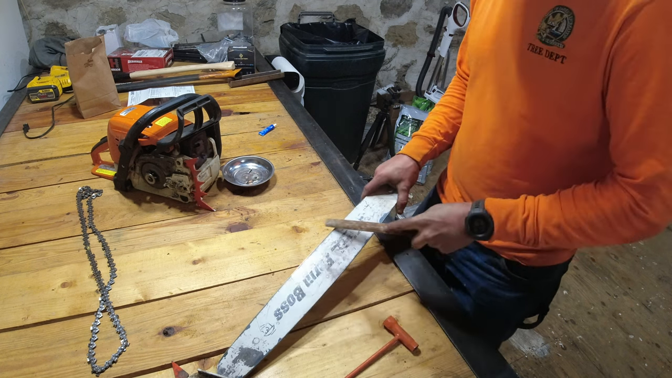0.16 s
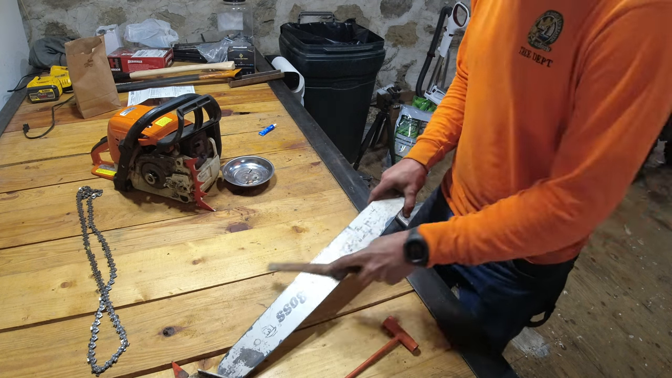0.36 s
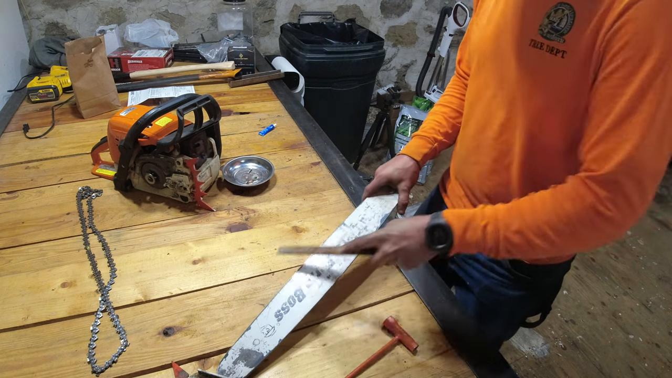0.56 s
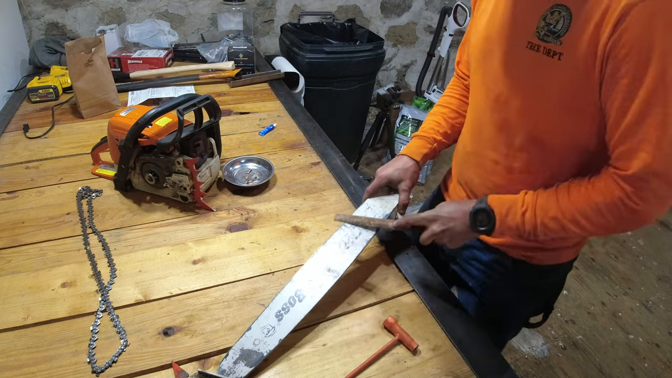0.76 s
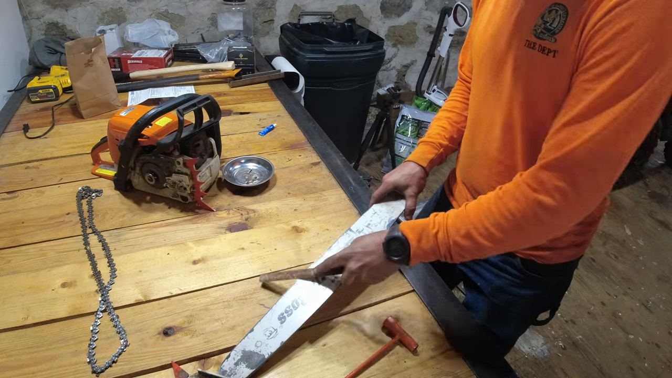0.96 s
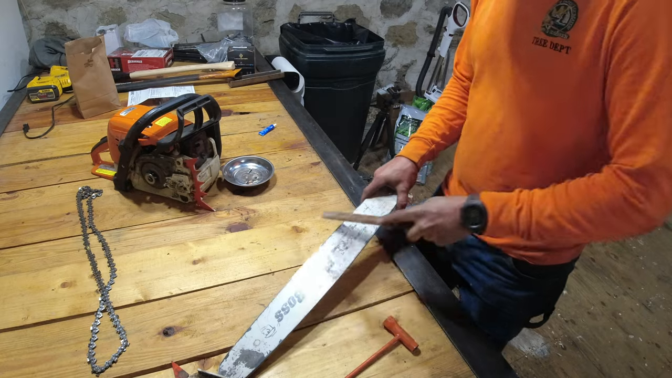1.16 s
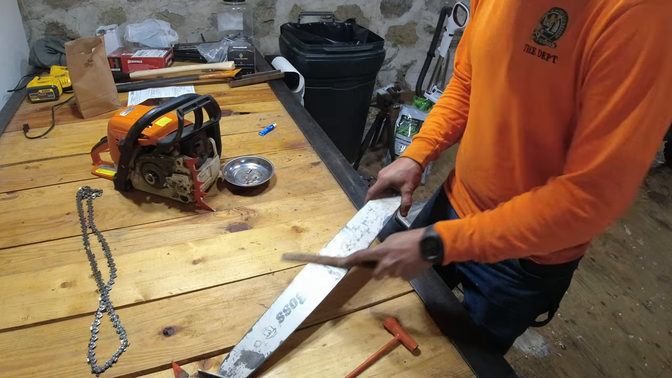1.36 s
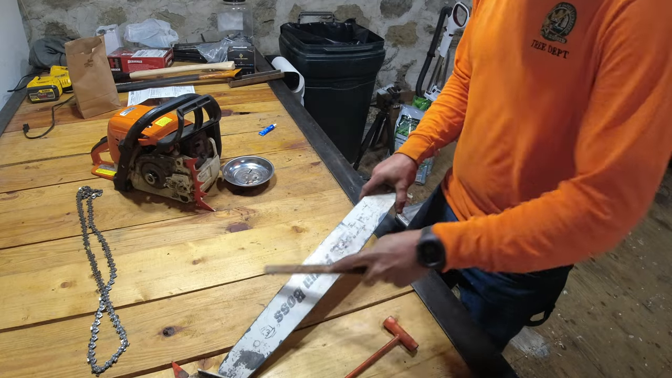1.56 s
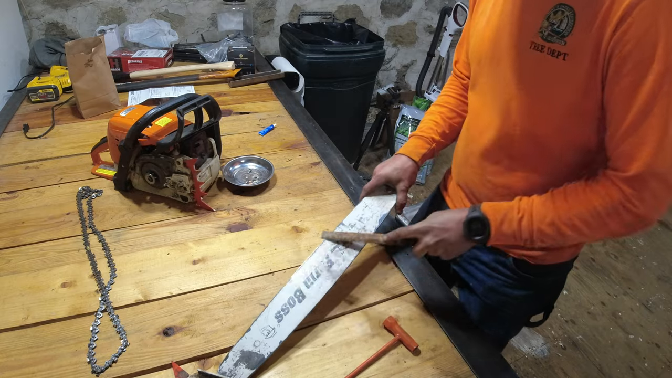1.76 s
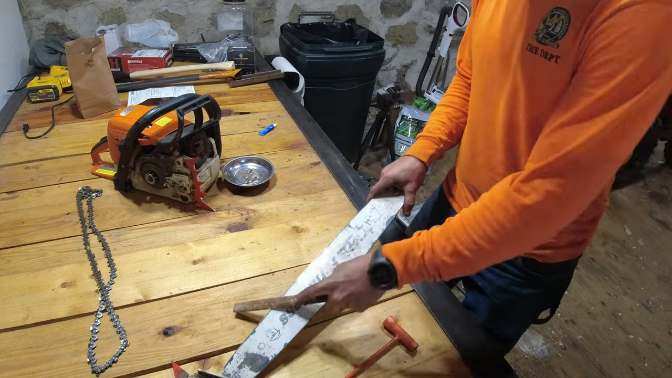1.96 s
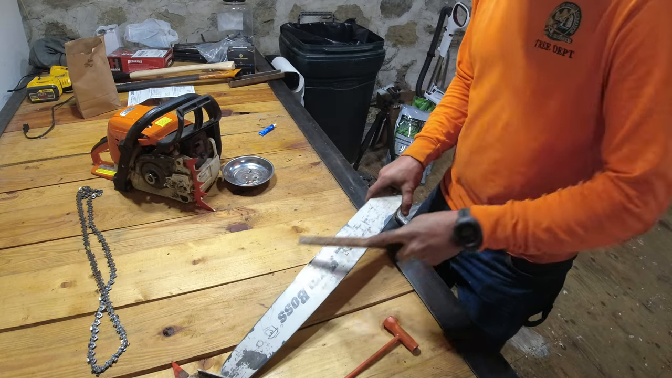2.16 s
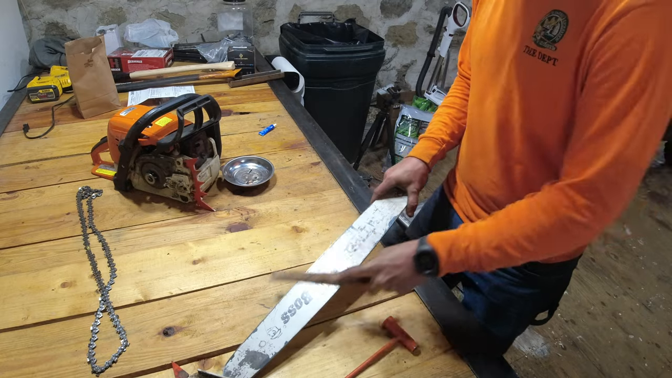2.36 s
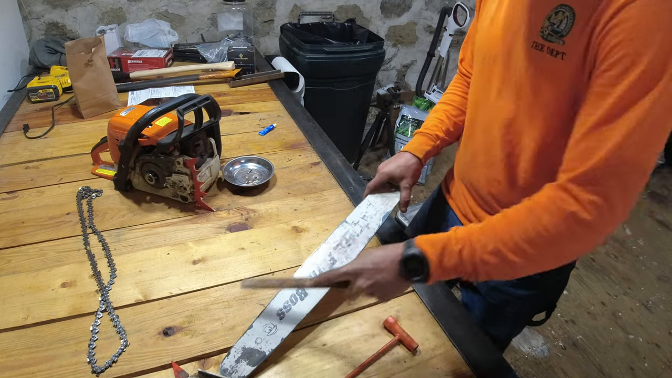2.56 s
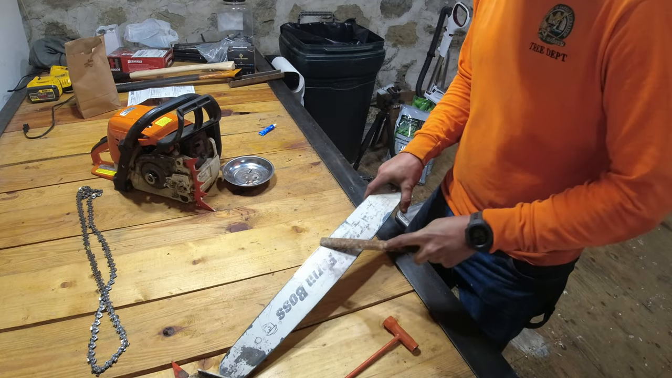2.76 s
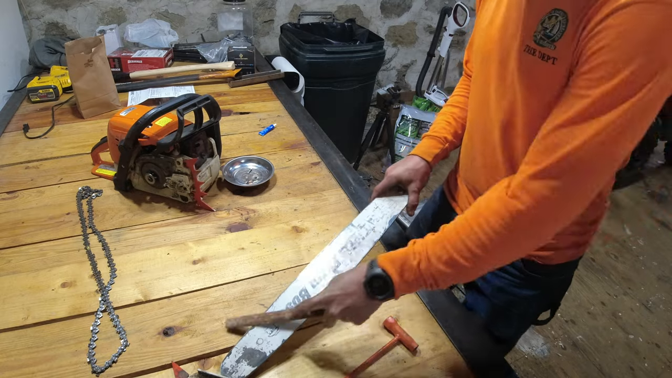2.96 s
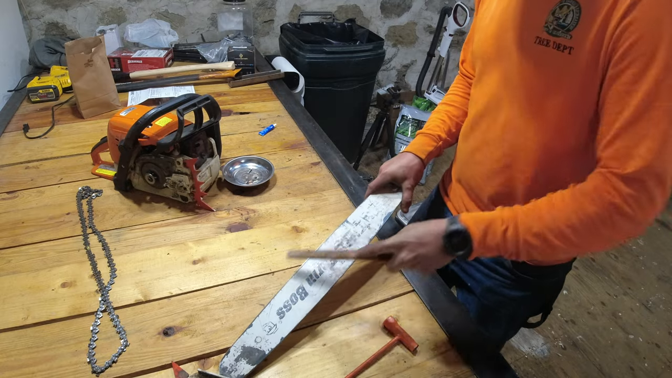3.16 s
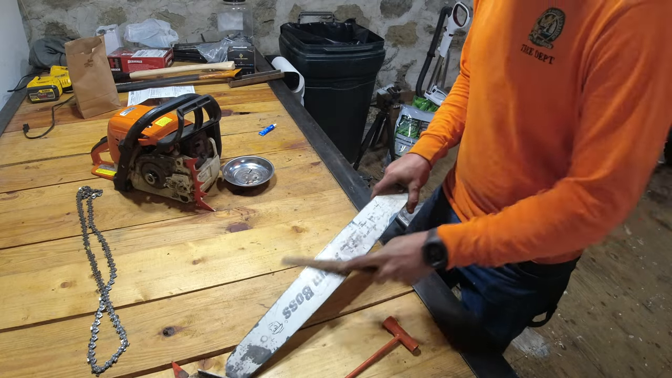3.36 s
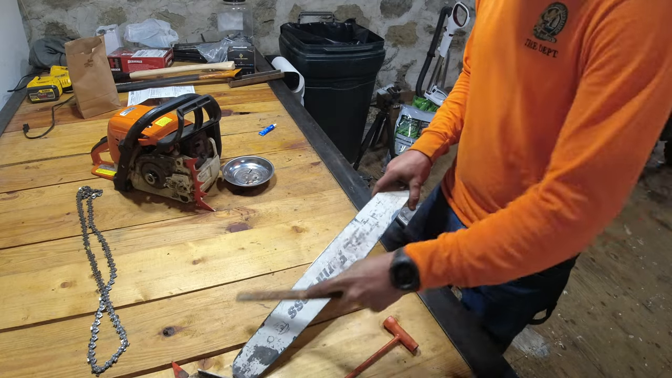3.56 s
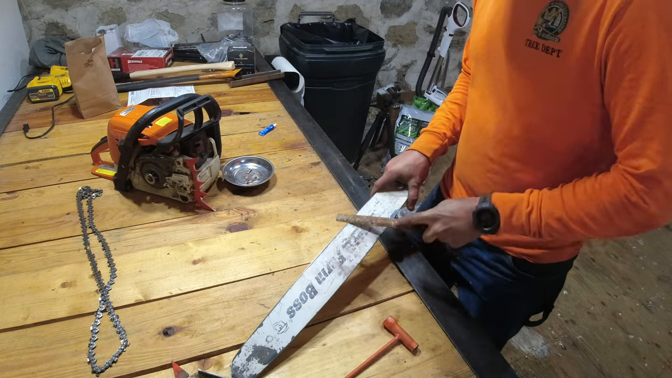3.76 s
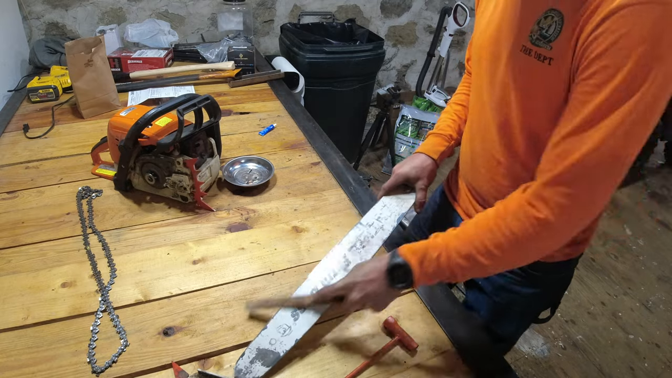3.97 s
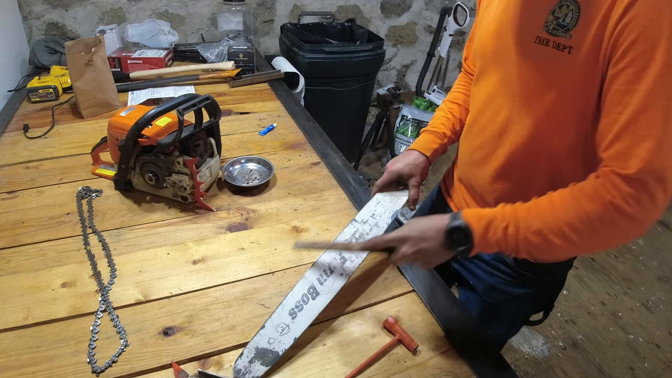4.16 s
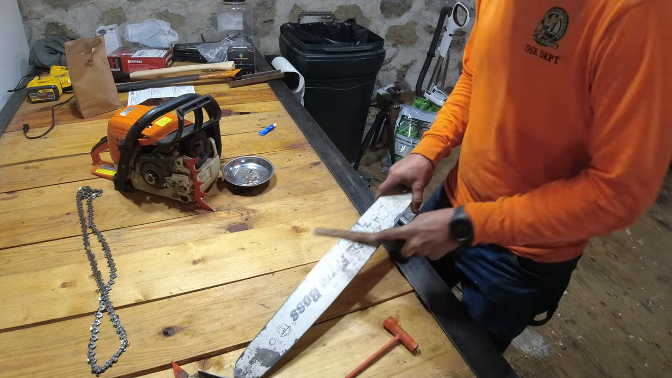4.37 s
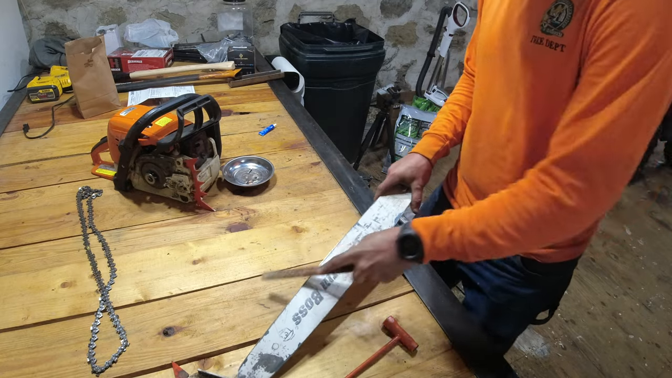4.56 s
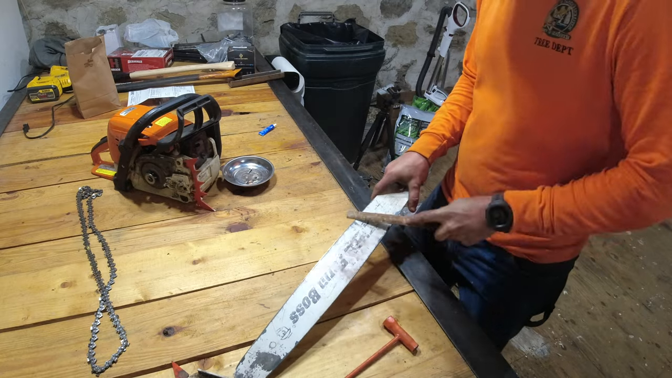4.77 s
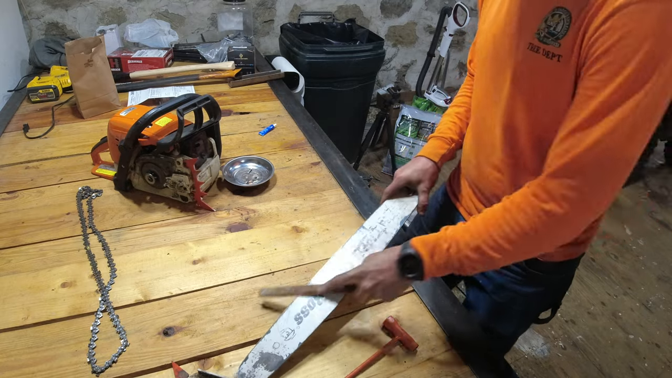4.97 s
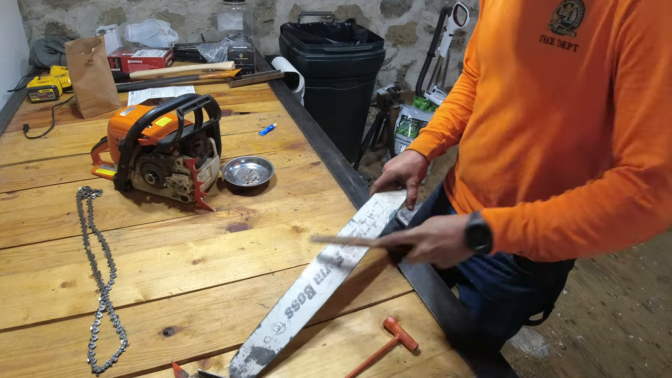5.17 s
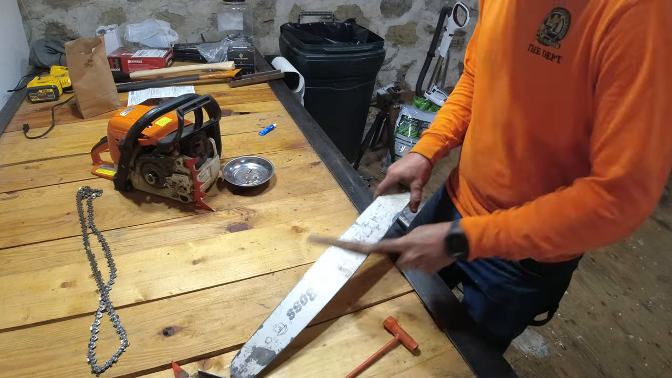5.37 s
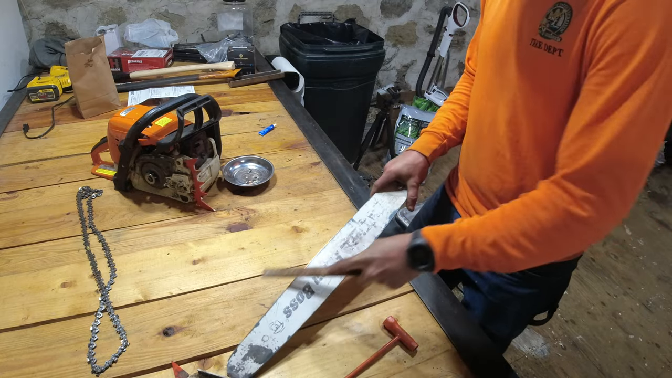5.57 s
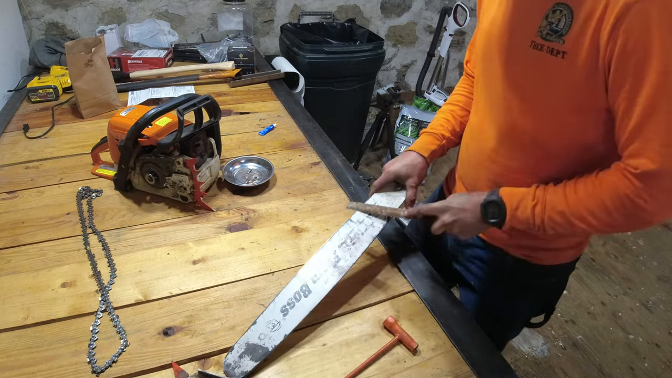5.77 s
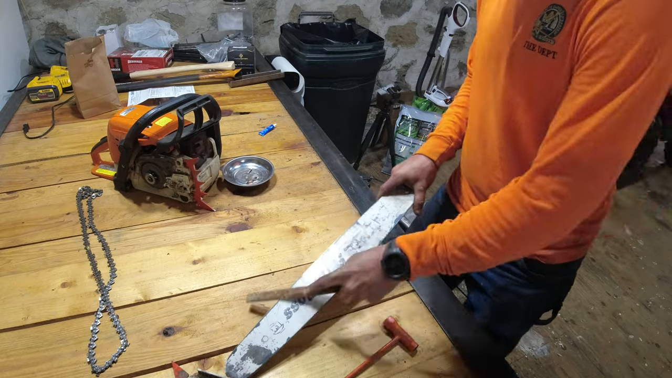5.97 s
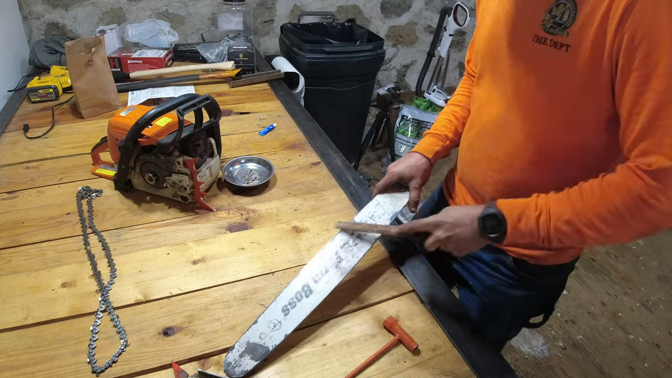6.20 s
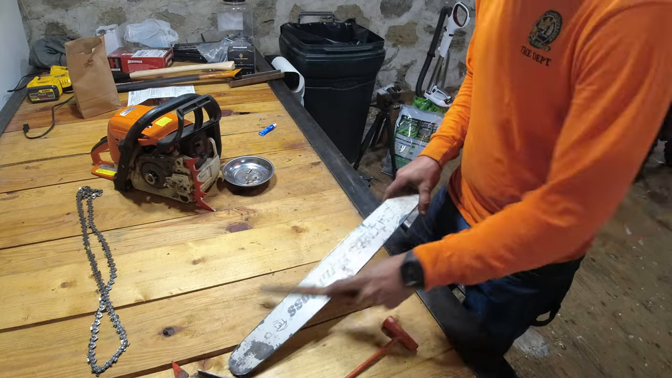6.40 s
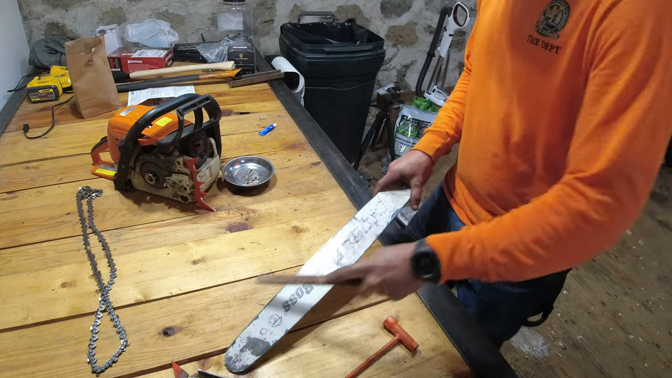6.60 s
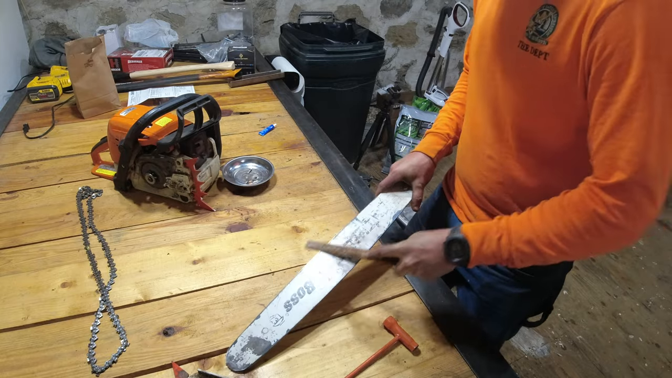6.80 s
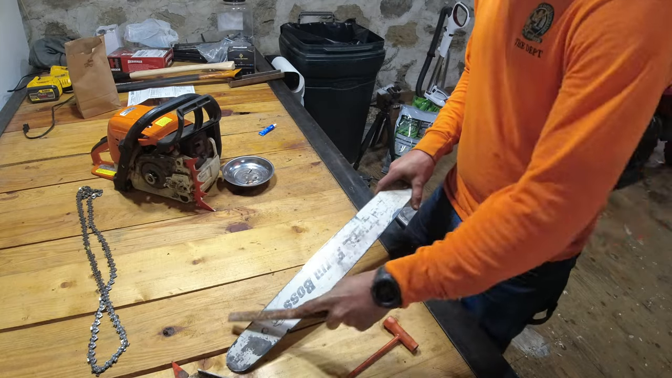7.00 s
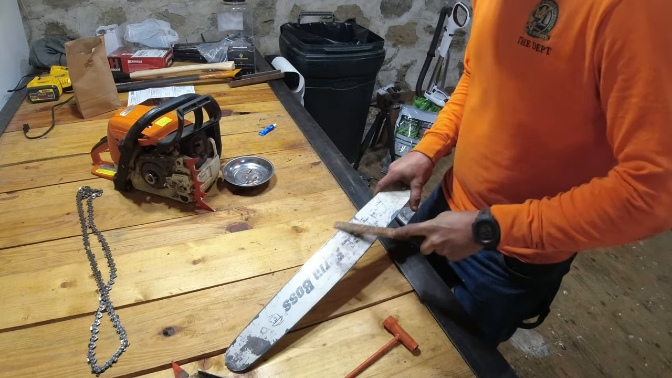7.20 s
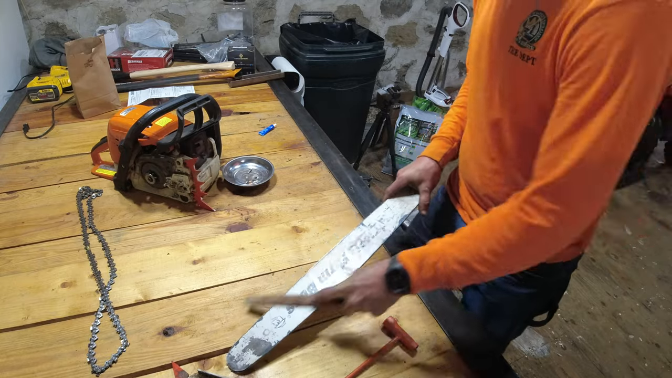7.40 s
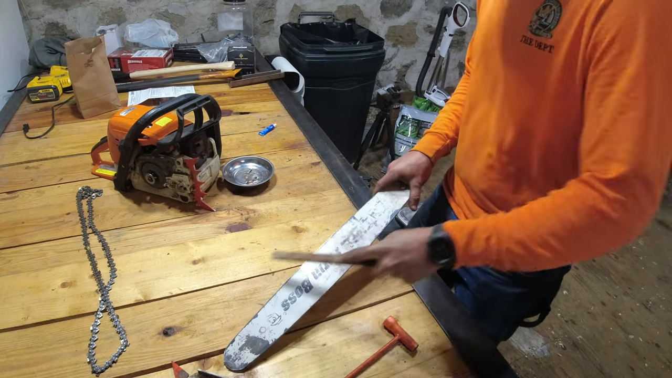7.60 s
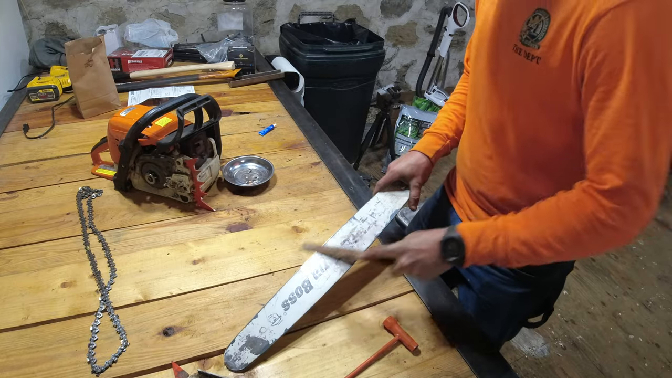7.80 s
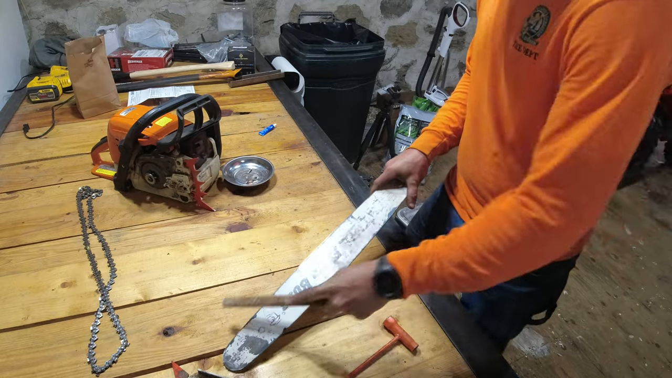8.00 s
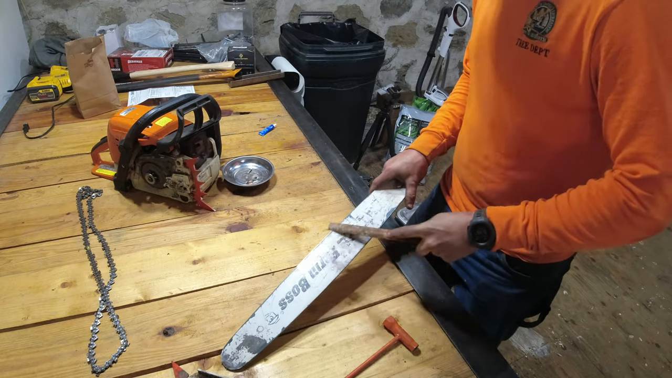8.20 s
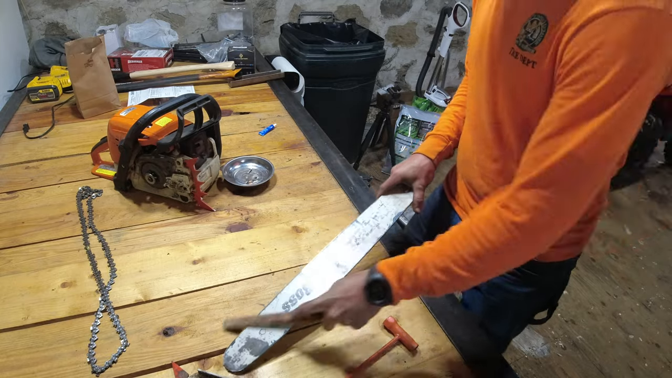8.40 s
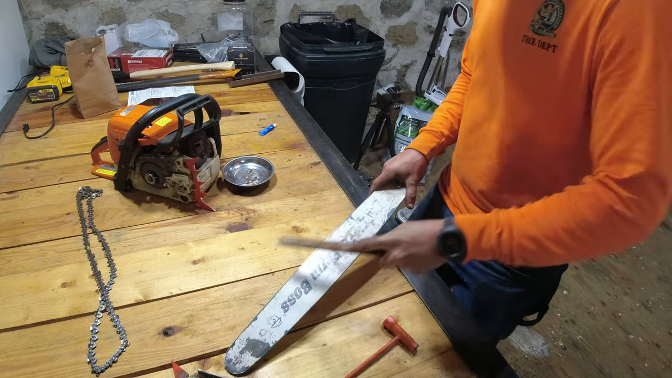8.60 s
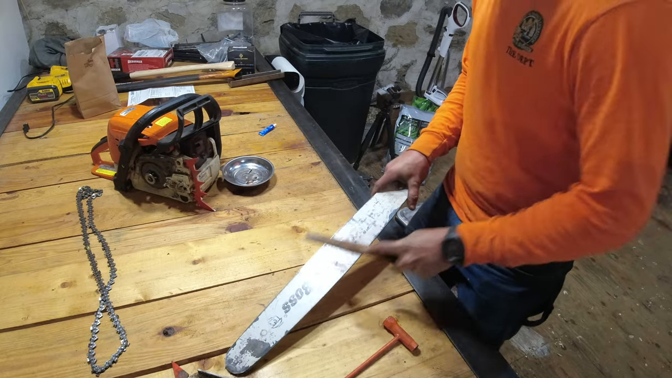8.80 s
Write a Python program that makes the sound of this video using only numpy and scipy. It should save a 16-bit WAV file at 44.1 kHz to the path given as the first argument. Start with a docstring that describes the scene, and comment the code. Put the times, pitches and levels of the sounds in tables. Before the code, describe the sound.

From 0 to about 9 seconds, a flat file is pushed along the edge of a steel chainsaw bar at a workbench. The sound opens at the end of a stroke already under way; new strokes land at about 0.3, 0.8, 1.3 and 1.8 seconds, and so on at half-second intervals, the last near 8.8. Each begins with a hard metallic clack and little rebound, with a soft low bench thump underneath. The teeth bite, and a dry rasp with buzzing grain and bright fizz quickens for about 0.2 seconds, the steel ringing briefly, then lifts off abruptly. Landings vary in force, with a gentle one near 1.8. Very faint return scuffs appear in some gaps, such as 0.26, 4.7 and 5.2. A soft low bump comes near 8.05. The perspective is close, with short small-room reflections and slight rumble.

```python
"""Filing steel on a wooden bench

A flat file lands on the edge of a steel guide bar and is pushed along it, about twice a second.
Tooth impulses and random chip impulses excite resonant modes of bar and file, over a rasp and a fizz.
Each new landing is a noise blow with a small bounce, and decaying sines thump the bench.
Noise tails give the answer of a small workshop; a faint rumble lies beneath."""
import sys
import numpy as np
from scipy import signal
from scipy.fft import rfft, irfft, next_fast_len
from scipy.io import wavfile
from scipy.ndimage import uniform_filter1d, map_coordinates

SR = 44100
rng = np.random.default_rng(int(sys.argv[2]) if len(sys.argv) > 2 else 0)


def unload_audio(sound):
    """Save the sound as a 16-bit wav file, at the path given as the first command line argument."""
    columns = np.transpose(np.atleast_2d(sound))
    # keep every value between -1 and 1, then stretch to whole-number steps
    steps = np.round(np.clip(columns, -1, 1) * 32767)
    wavfile.write(sys.argv[1], SR, steps.astype(np.int16))


N = 390285

# All table levels are relative; each source adds its own gain.
# One row a stroke, the first already under way at t = 0. Columns: landing t/s, blow level/dB,
# bench thump level/dB, bite t/s, rebound dip/dB, hardest push t/s, lift t/s, coarse cut level/dB,
# fine chips level/dB, chip sag/(dB/s), full tooth rate f/Hz, full rate t/s, tooth buzz level/dB.
# Times after the first column count from the landing.
STROKES = [ (-0.23, -18, -33, 0.034, 10, .11, .2, -23.5, -39, 42.5, 525, 0.11, 7),
           (0.2830, -13.5, -30.5, 0.02, 16, 0.13, 0.2, -24, -35.5, 27.5, 547, .179, -2.5),
           (0.808, -18, -35.5, 0.033, 26.5, 0.15, .19, -24.5, -34, 18, 510, 0.15, -5.5),
           (1.3121, -16.5, -38.5, 0.046, 17.5, 0.11, .19, -25, -36, 33, 600, 0.13, -0.5),
           (1.8092, -28.5, -32, 0.03, 17.5, 0.15, .23, -25.5, -34.5, 39.5, 545, 0.11, -1),
           (2.337, -13, -31, .022, 5, 0.093, 0.19, -23.5, -40, 14, 717, .142, -11.5),
           (2.8265, -22, -32, 0.039, 25.5, 0.13, 0.22, -25, -36, 45, 720, 0.14, -5),
           (3.3448, -17.5, -30.5, 0.038, 13, 0.11, 0.21, -24.5, -34.5, 67.5, 623, .12, -5),
           (3.8536, -14.5, -32, 0.042, 11.5, .11, 0.22, -24.5, -35.5, 49.5, 312, 0.11, -4),
           (4.3706, -18, -33.5, 0.033, 6, 0.12, 0.18, -25.5, -34, 103.5, 680, 0.13, -0.5),
           (4.8724, -12, -35, .039, 10, 0.098, 0.18, -25, -34, 79.5, 537, .119, -4),
           (5.3422, -20.5, -33, 0.04, 10, 0.12, .2, -25.5, -31, 84.5, 467, 0.097, -0.5),
           (5.8392, -19.5, -35.5, 0.037, 19.5, 0.066, 0.2, -24, -32.5, 91, 325, .084, -6),
           (6.3220, -14.5, -33, 0.044, 12, 0.12, 0.22, -26.5, -34.5, 57.5, 464, .105, -0.5),
           (6.8319, -13.5, -30.5, 0.018, 1.5, .1, 0.19, -25.5, -39.5, 51, 312, .088, -6),
           (7.3161, -18, -33, 0.043, 14.5, .11, 0.21, -26.5, -36.5, 44.5, 452, 0.11, -1.5),
           (7.811, -13, -32.5, 0.033, 10, .1, .19, -24, -35, 48, 384, 0.056, 0),
           (8.3130, -14, -32.5, 0.04, 6, 0.11, 0.17, -25.5, -34.5, 44, 463, 0.1, -3),
           (8.8217, -12, -35, .04, 6.5, 0.091, 0.23, -19.5, -34, 50, 430, 0.082, -4), ]
# Faint scuffs as the file is carried back: centre t/s, 1/e half-length t/s, level/dB
RETURN_SCUFFS = [(0.262, 0.044, -58), (4.704, 0.028, -60.5), (5.212, 0.037, -59), (5.704, 0.036, -61.5),
                 (6.696, .03, -68.5), (8.708, 0.016, -73)]
# Resonant modes of the bar, the file and the bench: f/Hz, decay by 60 dB t/s, level/dB
BAR_MODES = [(328, 0.081, 7.5), (498.4, 0.15, 6), (563, 0.17, -2), (652, 0.063, 4), (730, 0.14, 2),
             (851, 0.18, 2.5), (915, 0.55, -6), (996, 0.22, 1), (1064.4, 0.18, 0), (1181, 0.054, -4),
             (1247, 0.058, -6.5), (1573, 0.03, -4), (1717, 0.11, -2), (1906, 0.22, -6), (2170, 0.064, -4.5)]
FILE_MODES = [(2420, .05, -6), (2610, 0.033, -6.5), (2890, 0.027, -9), (3420, .04, -8.5), (3932, 0.022, 4),
              (4089, 0.035, 6.5), (4280, 0.084, 0), (5320, 0.047, -12), (5620, 0.03, -12),
              (6040, .03, -13.5), (10860, 0.087, -12)]
BENCH_MODES = [(64.5, 0.12, -11), (149.4, 0.16, -1), (173, 0.18, 0.5)]
# Spectrum of the broad sound of the cut: f/Hz, level/dB
RASP_SPECTRUM = [(40, -48), (100, -29.5), (150, -22), (320, -2.5), (700, -1.5), (1300, -4.5), (2200, -10.5),
                 (4000, -54)]
# Spectrum of the fine chips: f/Hz, level/dB
FIZZ_SPECTRUM = [(1200, -43), (2200, 2.5), (3100, -5), (3700, -6.5), (5100, -12), (6200, -17.5),
                 (7500, -18), (12500, -18), (15500, -18)]
# Spectrum of the low background: f/Hz, level/dB
RUMBLE_SPECTRUM = [(14, -13), (24, 2), (36, -12), (55, -7.5), (85, -18), (170, -12.5), (400, -25.5),
                   (1000, -30), (3000, -48.5), (16000, -84.5)]
# Colour of the landing blow that drives the file and the fizz: f/Hz, level/dB
BLOW_SPECTRUM = [(1500, 6), (4500, -1.5), (9000, -3.5)]
# Room decay, scaled separately for the mid and side tails: f/Hz, relative decay t/s
ROOM_DECAY = [(100, .45), (300, 0.26), (800, 0.27), (2000, 0.22), (4100, 0.19), (6500, .2), (12000, 0.13)]
# Colour of the stereo side signal: f/Hz, level/dB
SIDE_SPECTRUM = [(30, -27), (60, -34), (110, -34), (200, -38), (380, -24), (700, -15), (1290, -5),
                 (2380, -2), (4400, -3.5), (8120, 0.5), (15000, -2)]

# First contact: duration, levels under the full cut, firmer before a deep rebound
TOUCH_S, TOUCH_DB, TOUCH_FINE_DB, TOUCH_PER_DIP = 0.012, -6.5, -12, 0.44
REBOUND_S = 0.022  # the file springs off the edge
# The teeth bite again: rise time, level under the hardest push, share of the dip in the coarse cut
BITE_RISE_S, BITE_DB, COARSE_DIP = 0.034, -2, 0.6
CATCH_S, CATCH = 0.003, 0.45  # share of the bite that comes at once, and its rise time
EASE_DB_PER_S, LINGER_S = 70.5, 0.032  # coarse cut eases after the hardest push and outlasts the chips
LIFT_DB_PER_S, LIFT_FINE_DB_PER_S = 418.5, 332.5  # fading as the file lifts
# Tooth rate at landing, power of the speed-up, gain after full rate
START_HZ, SPEED_UP, CREEP_HZ_PER_S = 180.6, 1.5, 300
BUZZ_RISE_DB_PER_S, BUZZ_FADE_DB_PER_S = 47, 121  # the buzz is clearest at the hardest push
THROW = 0.6  # depth of the chips' pulsing once a tooth, at landing rate
RING_DIP_DB = -4.5  # the file rings less between touch and bite
# As the contact slides, the bar's modes above this pitch grow and those below fade
CLIMB_DB_PER_S, CLIMB_HZ, CLIMB_WIDTH_HZ = 25, 1000, 700
# The file's modes above this pitch fade and those below grow
SINK_DB_PER_S, SINK_HZ, SINK_WIDTH_HZ = 44, 4007, 200
TOP_HZ = 16050  # upper limit of the sound


def amp(db):
    """Logarithmic level: decibels become an amplitude ratio."""
    return 10 ** (np.asarray(db) / 20)


def unit(x):
    """Normalisation: a signal is scaled to rms 1."""
    return x / np.sqrt(np.mean(x ** 2) + 1e-20)


def along(points, hz):
    """Logarithmic interpolation: (f, value) points are read on a log frequency axis."""
    f, value = np.transpose(points)
    return np.interp(np.log(hz + 1), np.log(f + 1), value)


def wobble(rate):
    """Slow random modulation: a smooth curve through random knots, rate knots a second."""
    fine = np.arange(0, N * rate / SR + 1, 1 / 8)
    knots = rng.standard_normal(len(fine) // 8 + 4)
    return np.interp(np.arange(N) * rate / SR, fine, map_coordinates(knots, [fine]))


def coloured(x, points):
    """Minimum-phase filtering: the cepstrum, folded to positive time, makes the filter causal."""
    m = next_fast_len(len(x) + 8192, True)
    gain = amp(along(points, np.fft.rfftfreq(m, 1 / SR)))
    cepstrum = irfft(np.log(gain + 1e-6), m)
    cepstrum[1:m // 2] *= 2
    cepstrum[m // 2 + 1:] = 0
    return irfft(rfft(x, m) * np.exp(rfft(cepstrum)), m)[:len(x)]


def stroke_clock():
    """Periodic excitation: time since the last landing and that stroke's columns, at every sample."""
    t, rows = np.arange(N) / SR, np.array(STROKES)
    current = np.clip(np.searchsorted(rows[:, 0], t) - 1, 0, None)
    row = rows[current].T
    return t - row[0], row


def pressure():
    """Contact force: touch, rebound, bite, push, easing and lift set coarse and fine cutting gains."""
    since, row = stroke_clock()
    bite, dip_db, hardest, lift, coarse_db, fine_db, sag = row[3:10]

    def after(s):
        return np.maximum(since - s, 0)

    def ramp(a, b):
        return np.clip((since - a) / np.maximum(b - a, 0.001), 0, 1)

    bitten = bite + BITE_RISE_S
    rebound = ramp(TOUCH_S, TOUCH_S + REBOUND_S)
    biting = CATCH * ramp(bite, bite + CATCH_S) + (1 - CATCH) * ramp(bite, bitten)

    def before_bite(touch_db, low_db):
        return (1 - biting) * (touch_db + (low_db - touch_db) * rebound)

    coarse_db = coarse_db + before_bite(TOUCH_DB + TOUCH_PER_DIP * dip_db, BITE_DB - COARSE_DIP * dip_db)
    coarse_db += BITE_DB * biting * (1 - ramp(bitten, hardest))
    coarse_db -= EASE_DB_PER_S * after(hardest) + LIFT_DB_PER_S * after(lift + LINGER_S)
    fine_db = fine_db + before_bite(TOUCH_FINE_DB, -dip_db)
    fine_db -= sag * after(bitten) + LIFT_FINE_DB_PER_S * after(lift)
    touch = ramp(0, TOUCH_S) ** 2
    return touch * amp(coarse_db), touch * amp(fine_db)


def teeth():
    """Impulse train: one uneven push a tooth, at a rising rate; also the pulsing of thrown chips."""
    since, row = stroke_clock()
    hardest, (full_hz, full_s, buzz_db) = row[5], row[10:]
    rate = START_HZ + (full_hz - START_HZ) * np.clip(since / full_s, 0, 1) ** SPEED_UP
    rate += CREEP_HZ_PER_S * np.maximum(since - full_s, 0)
    turns = np.cumsum(rate * (1 + 0.028 * wobble(45))) / SR  # teeth passed so far
    push = np.diff(np.floor(turns), prepend=0) * amp(2.5 * rng.standard_normal(N))
    slope = np.where(since < hardest, BUZZ_RISE_DB_PER_S, BUZZ_FADE_DB_PER_S)
    db = buzz_db - slope * abs(since - hardest) + 3.2 * wobble(35)
    throw = np.clip(THROW * START_HZ / rate, 0, 1) * np.cos(2 * np.pi * turns)
    return push * np.sqrt(SR / rate) * amp(db), throw  # even power at every tooth rate


def chips(rate, spread_db):
    """Shot noise: metal tears as random impulses of uneven size, on average rate a second."""
    torn = rng.random(N) < rate / SR
    return unit(rng.standard_normal(N) * torn * amp(spread_db * rng.exponential(size=N)))


def patchy(x, depth_db):
    """Time-frequency modulation: smoothed random gains make patches in the spectrum."""
    z = signal.stft(x, nperseg=256)[2]
    field = uniform_filter1d(rng.standard_normal(z.shape), size=3, axis=0)
    field = uniform_filter1d(field, size=7, axis=1)
    return signal.istft(z * amp(depth_db * unit(field)), nperseg=256)[1][:N]


def cutting():
    """Broadband excitation: teeth and coarse chips force the low modes, fine chips file and fizz."""
    press, bright = pressure()
    scuff = scuffs()
    press, bright = press + scuff, bright + amp(-15.0) * scuff
    push, throw = teeth()
    coarse = patchy(chips(rate=6000, spread_db=1.5), depth_db=2.5)
    fine = patchy(chips(rate=19000, spread_db=-1.1), depth_db=2.5)
    buzz = amp(1.5) * coloured(push, [(350, 2.0), (1000, 2.5), (2600, -14.0)])
    low = press * amp(1.4 * wobble(80)) * (coarse + buzz)
    high = bright * amp(0.37 * wobble(100)) * (1 + throw) * fine
    return low, high


def ringing(force, modes, drift_db, tilt_db, pivot_hz, width_hz):
    """Modal resonance: two-pole modes ring with the force; their shares drift as the contact slides."""
    out = np.zeros(N)
    for hz, t60, db in modes:
        r, w = amp(-60 / (t60 * SR)), 2 * np.pi * hz / SR
        share_db = db + drift_db * wobble(12) + tilt_db * np.tanh((hz - pivot_hz) / width_hz)
        out += signal.lfilter([1 - r, 0, r - 1], [1, -2 * r * np.cos(w), r * r], force * amp(share_db))
    return out


def steel(low, high):
    """Superposition: narrow modes of bar and file stand over a broad rasp and fizz."""
    since, row = stroke_clock()
    unbitten = (since > TOUCH_S) & (since < row[3])
    free = amp(-32 * since + RING_DIP_DB * unbitten)  # the free end rings less as the stroke runs on
    slid = np.minimum(since, row[6]) - row[5]  # s past the hardest push, until the lift
    bar = amp(6) * ringing(low, BAR_MODES, 4.5, CLIMB_DB_PER_S * slid, CLIMB_HZ, CLIMB_WIDTH_HZ)
    file = amp(11) * ringing(high * free, FILE_MODES, 2.5, -SINK_DB_PER_S * slid, SINK_HZ, SINK_WIDTH_HZ)
    rasp = amp(7.5) * coloured(low, RASP_SPECTRUM)
    fizz = amp(9.0) * coloured(high, FIZZ_SPECTRUM)
    return bar + rasp + file + fizz


def tail(seconds, scale):
    """Reverberant decay: noise of energy 1 dies at a different speed in each frequency band."""
    hz, t, z = signal.stft(rng.standard_normal(int(seconds * SR)), SR, nperseg=256)
    decay = amp(-60 * t / (scale * along(ROOM_DECAY, hz)[:, None]))
    x = signal.istft(z * decay, SR, nperseg=256)[1]
    return x / np.linalg.norm(x)


def workshop(x):
    """Room response: convolution with fresh tails for every stroke gives mid and diffuse side sound."""
    mid, side = np.zeros(N + SR), np.zeros(N + SR)
    edges = [0] + [round((row[0] - 0.05) * SR) for row in STROKES[1:]] + [N]
    for a, b in zip(edges, edges[1:]):
        heard = np.pad(x[a:b], (0, SR // 2))
        delayed = np.pad(x[a:b], (220, 0))  # reflections arrive 5 ms late
        heard += amp(-11.5) * signal.fftconvolve(delayed, tail(0.6, scale=1.19))[:len(heard)]
        mid[a:][:len(heard)] += heard
        side[a:][:len(heard)] += signal.fftconvolve(heard, tail(0.1, scale=0.08))[:len(heard)]
    z = signal.stft(mid[:N], nperseg=256)[2]
    random_phase = np.exp(2j * np.pi * rng.random(z.shape))
    diffuse = signal.istft(z * random_phase, nperseg=256)[1][:N]  # scattered, unlike in the two channels
    return mid[:N], coloured(0.5 * side[:N] + 0.75 * diffuse, SIDE_SPECTRUM)


def rumble():
    """Filtered noise: a faint low rumble of uneven level."""
    noise = unit(coloured(rng.standard_normal(N), RUMBLE_SPECTRUM))
    return amp(-68 + 3.0 * wobble(25.0)) * noise


def scuffs():
    """Light friction: Gaussian gains let the cutting noise through faintly on the way back."""
    t = np.arange(N) / SR
    return sum(amp(db) * np.exp(-((t - s) / length) ** 2) for s, length, db in RETURN_SCUFFS)


def landings():
    """Impact: a short noise blow with a slower-dying bounce, and decaying sines of the bench."""
    low, high, thump = np.zeros(N + SR), np.zeros(N + SR), np.zeros(N + SR)
    t = np.arange(SR // 6) / SR
    for s, db, thump_db, *_ in STROKES[1:]:
        start = round(s * SR)
        bounce = 0.12 * (t > 0.004) * amp(-60 * (t - 0.004) / 0.11)
        blow = rng.standard_normal(len(t)) * np.tanh(t / 0.00016) * (amp(-60 * t / 0.012) + bounce)
        low[start:][:len(t)] += amp(db - 5.5) * blow
        high[start:][:len(t)] += amp(db - 8.5) * blow
        wood = sum(amp(level - 60 * t / t60) * np.sin(2 * np.pi * hz * t) for hz, t60, level in BENCH_MODES)
        thump[start:][:len(t)] += amp(thump_db + 5.5) * wood * (1 - np.exp(-t / 0.0071))
    return low[:N], coloured(high[:N], BLOW_SPECTRUM), thump[:N]


def bench_bump():
    """Tone burst: one soft bump of the bench is a 60 Hz sine under a Gaussian envelope."""
    t = np.arange(N) / SR
    return amp(-46.5) * np.sin(2 * np.pi * 60 * t) * np.exp(-((t - 8.06) / 0.026) ** 2)


def scene():
    """Source, resonator and room in series: mid and side become left and right."""
    low, high = cutting()
    blow_low, blow_high, thump = landings()
    mid, side = workshop(steel(low + blow_low, high + blow_high) + thump)
    mid = mid + rumble() + bench_bump()
    return np.array([mid + side, mid - side])


def record(dry):
    """Band limitation: the gain falls to nothing over the last 300 Hz below the upper limit."""
    hz = np.fft.rfftfreq(N, 1 / SR)
    return irfft(rfft(dry) * np.clip((TOP_HZ - hz) / 300, 0, 1) ** 2, N)


dry = scene()
out = record(dry)
unload_audio(out)
```